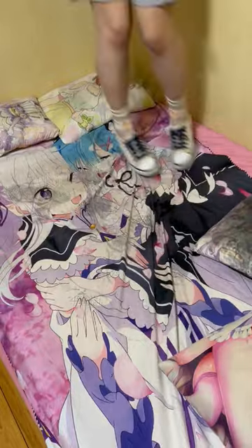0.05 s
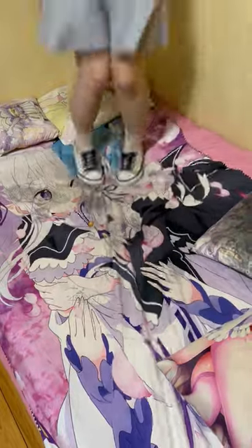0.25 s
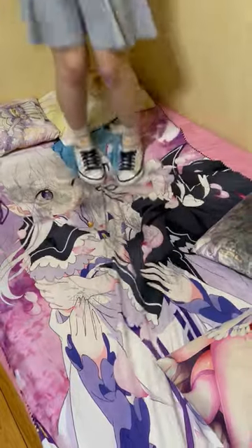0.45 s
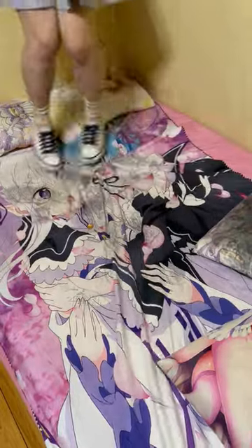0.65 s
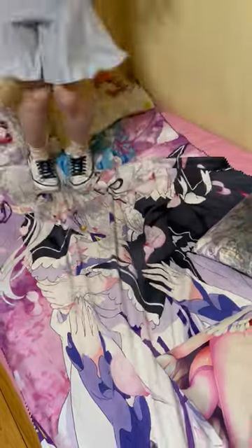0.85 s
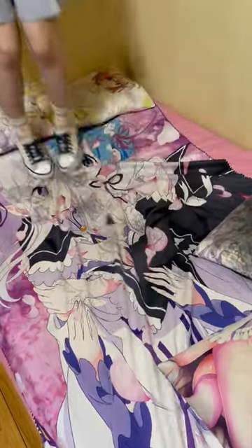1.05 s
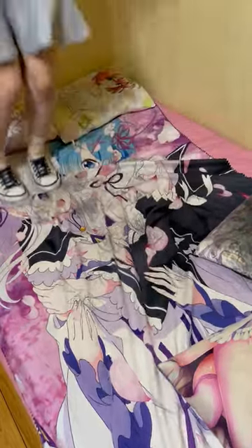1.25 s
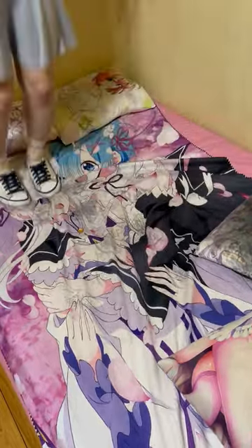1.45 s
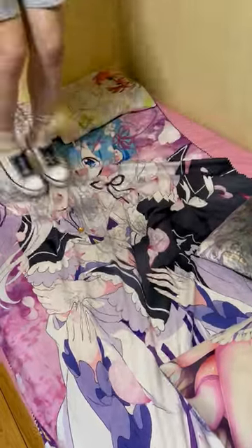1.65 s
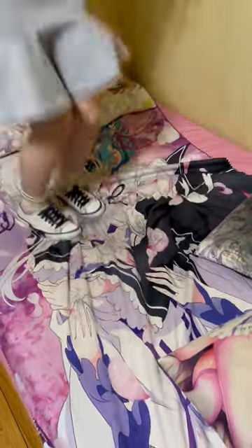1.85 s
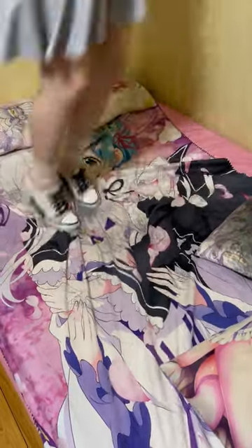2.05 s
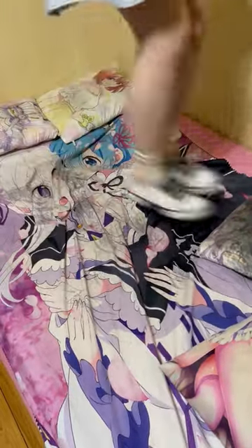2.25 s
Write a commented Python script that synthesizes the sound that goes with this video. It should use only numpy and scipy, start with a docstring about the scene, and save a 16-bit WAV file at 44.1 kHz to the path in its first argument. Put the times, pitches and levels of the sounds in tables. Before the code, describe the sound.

Someone bounces on a bed, heard close in a small room. Dull mattress thumps land at about 0.3, 0.8, 1.3 and 1.9 seconds, each with sneaker pats, rustling bedding and a lingering low hum from the bed frame. Three light metal clinks come in the first 0.6 seconds. Soles squeak faintly near 0.5 and 1.6 seconds. Small ticks lead to a cloth swish and a brighter tick at 2.2 seconds.

```python
"""A small room, a close pair of microphones: someone in canvas sneakers bounces four times on a made bed.
The frame is already humming from an earlier push; metal parts clink and a skirt flutters in flight.
At each landing the soles pat the cover, the bedding hisses as the mattress sinks and rises,
and the base thumps and hums on. Cloth drags over cloth, and twice a sole squeaks softly on the way up.
Around the last leap something ticks brightly, loudest at the very end, just after a swish of cloth."""
import sys
import numpy as np
from scipy import signal
from scipy.fft import rfft, irfft
from scipy.io import wavfile

SR = 44100
rng = np.random.default_rng(int(sys.argv[2]) if len(sys.argv) > 2 else 0)


def transcribe(signal):
    """Save signal, clipped to [-1, 1], as a 16-bit WAV file at the path in sys.argv[1]."""
    frames = np.atleast_2d(signal).T
    limited = np.clip(frames, -1, 1)
    pcm = np.round(limited * 32767).astype(np.int16)
    wavfile.write(sys.argv[1], SR, pcm)


N = 101429
T = np.arange(N) / SR
HZ = np.maximum(np.fft.rfftfreq(N, 1 / SR), 1)


def from_db(db):
    """Decibels to gain."""
    return 10 ** (np.asarray(db) / 20)


def unit_rms(x):
    """Scale to unit power."""
    return x / np.sqrt(np.mean(x ** 2) + 1e-20)


def at_hz(points):
    """Read a table at every frequency, along a log axis."""
    hz, value = np.transpose(points)
    return np.interp(np.log(HZ), np.log(hz), value)


# How alike the two microphones hear a noise. Each row: frequency in Hz, likeness from 0 to 1.
MIC_LIKENESS = [(100, .998), (300, .97), (700, .86), (1200, .75), (1900, .75), (2600, .58), (4200, .45),
                (6000, .9), (9000, .94), (15000, .9)]

def colour(pair, spectrum):
    """Give two unrelated signals a spectrum and the likeness of left and right; rms 1."""
    mid, side = rfft(pair) * from_db(at_hz(spectrum))
    alike = np.clip(at_hz(MIC_LIKENESS), 0, .9995)
    left_right = np.sqrt(1 + alike) * mid + np.sqrt(1 - alike) * side * [[1], [-1]]
    return unit_rms(irfft(left_right, N))


def noise(spectrum):
    """Smooth stereo noise."""
    return colour(rng.standard_normal((2, N)), spectrum)


def grains(spectrum, per_s, spread_db):
    """Random tiny snaps of uneven size."""
    snaps = rng.random(N) < per_s / SR
    sizes = from_db(spread_db * np.minimum(rng.exponential(1, N), 3))
    return colour(snaps * sizes * rng.choice([-1, 1], (2, N)), spectrum)


def blow(start, rise_s, t60):
    """Envelope: a smooth rise, then a fall of 60 dB every t60 seconds."""
    age = T - start
    attack = np.sin(np.pi / 2 * np.clip(age / rise_s, 0, 1)) ** 2
    return attack * from_db(-np.clip(60 * (age - rise_s) / t60, 0, 200))


def ring(start, hz, rise_s, t60):
    """A struck resonance."""
    return blow(start, rise_s, t60) * np.sin(2 * np.pi * hz * (T - start))


def swell(middle, half_s, db):
    """Envelope: a bell curve that peaks at db."""
    return from_db(db) * np.exp(-((T - middle) / half_s) ** 2 / 2)


# The room's background. Each row: frequency in Hz, relative level in dB.
AIR_SPECTRUM = [(20, -15), (40, 5), (60, 0), (170, -5.5), (300, -11), (1000, -22), (2500, -30), (6000, -38),
                (15000, -48)]

def room_tone():
    """A faint, low rush at the microphones throughout."""
    return from_db(-55.5) * noise(AIR_SPECTRUM)


# Bounces on the mattress. Each row: touch-down, deepest point and lift-off in seconds,
# then relative levels in dB of the sinking rustle, the rising rustle and the push on the frame.
BOUNCES = [(-.33, -.2, 0.15, -60, -60, -52.5), (0.136, 0.303, 0.65, -55.5, -61, -40),
           (0.676, .805, 1.128, -56, -60, -42), (1.186, 1.327, 1.624, -55.5, -58.5, -45.5),
           (1.72, 1.874, 2.13, -55.5, -55, -53)]
# The colours of the bedding. Each row: frequency in Hz, relative level in dB.
HISS_SPECTRUM = [(300, 2), (1000, 1.5), (2000, 3.5), (3500, 1.5), (6000, -0.5), (8500, -0.5), (12000, -4.5),
                 (15500, -4)]
RUSTLE_SPECTRUM = [(60, 4), (150, 1), (300, -4), (500, -11), (1000, -17), (1600, -27.5), (3000, -33.5),
                   (8000, -57)]
CRINKLE_SPECTRUM = [(200, -14), (800, 3), (2000, -3), (3800, -6.5), (6000, -14), (15000, -8)]

def bedding():
    """Cloth and padding hiss, rustle and crinkle: one swell as the feet sink, one as they rise."""
    motion = 0
    for touch, deepest, lift, sink_db, rise_db, _ in BOUNCES:
        sinking_s, rising_s = deepest - touch, lift - deepest
        sink = swell(deepest - 0.02, 0.52 * sinking_s, sink_db)
        rise = swell(deepest + 0.59 * rising_s, 0.27 * rising_s, rise_db)
        landed = np.clip((T - touch) / 0.016, 0, 1)
        not_lifted = (1 - np.tanh((T - lift) / 0.045)) / 2
        motion += landed * not_lifted * np.hypot(sink, rise)
    flatter_motion = motion.max() * (motion / motion.max() + 1e-9) ** 0.88
    hiss = from_db(2.5) * motion * noise(HISS_SPECTRUM)
    rustle = from_db(12.5) * flatter_motion * grains(RUSTLE_SPECTRUM, per_s=900, spread_db=1.5)
    crinkle = from_db(-5) * motion * grains(CRINKLE_SPECTRUM, per_s=640, spread_db=14.5)
    return hiss + rustle + crinkle


# The bed frame's modes. Each row: pitch in Hz, level in dB relative to the push, t60 in seconds.
FRAME_MODES = [(41, -2, 2), (53.57, 2, 2.7), (79, -9, 1), (101.53, 4.5, 0.8), (153.2, -2.5, 1.5)]

def frame_hum():
    """The deepest point of each bounce sets the frame humming."""
    return sum(from_db(push_db + db) * ring(deepest - 0.01595, hz, rise_s=0.032, t60=t60)
               for _, deepest, _, _, _, push_db in BOUNCES for hz, db, t60 in FRAME_MODES)


# Thumps from under the mattress. Each row: start in seconds, level in dB, pitch in Hz.
BASE_THUMPS = [(0.042, -44, 160), (.193, -36, 172), (.217, -27.5, 148), (.258, -30, 161),
               (0.279, -23.5, 154), (0.29, -21.5, 102.8), (0.307, -37, 189), (.331, -27.5, 103.4),
               (0.387, -52, 103), (0.45, -41, 151), (.702, -34.5, 149), (.737, -22.5, 144),
               (.779, -24, 154.6), (0.787, -37, 60), (0.792, -20, 97.8), (.830, -23, 98),
               (.852, -37.5, 169), (0.909, -41, 158), (1.211, -31.5, 143.7), (1.244, -31, 131.9),
               (1.258, -33.5, 192), (1.302, -25.5, 158.5), (1.311, -24.5, 95.3), (1.351, -35, 48.3),
               (1.354, -29, 108), (1.426, -42, 102), (1.545, -54.5, 160.3), (1.571, -41, 170),
               (1.751, -34, 176), (1.773, -29, 120), (1.804, -34, 171), (1.827, -27, 127.6),
               (1.854, -26, 149.2), (1.871, -29, 88.7), (1.883, -37.5, 46), (1.905, -46, 91),
               (2.005, -43, 138), (2.048, -52, 162), (2.106, -39.5, 135)]

def base_thumps():
    """The bed base thumps under the load; the lower the pitch, the longer it rings."""
    cycles_to_fade = np.log(1000) * 2.87  # about 20 cycles to fall 60 dB
    return sum(from_db(db) * ring(start, hz, rise_s=0.00554, t60=cycles_to_fade / hz)
               for start, db, hz in BASE_THUMPS)


# Clinks early on. Each row: start in seconds, then rattle, clack and ring levels in dB.
METAL_CLINKS = [(.043, -42, -40, -44), (0.31, -46.5, -45, -53), (0.5517, -48.5, -42.5, -49.5)]
# The metal's modes. Each row: pitch in Hz, level in dB relative to the ring, t60 in seconds.
METAL_MODES = [(4620, -21, 0.13), (4720, -12, 0.15), (4890, -11.5, 0.23), (4930, -18, 0.13),
               (7560, -21, .04), (9700, -11, .03)]
# The colours of a clink. Each row: frequency in Hz, relative level in dB.
CLACK_SPECTRUM = [(100, -21), (300, 2), (500, 2), (900, 0), (1200, -6), (2000, -16.5), (4000, -31),
                  (15000, -46)]
RATTLE_SPECTRUM = [(1000, 3), (3500, -20), (4900, 6), (5500, -11), (7500, -8), (9000, -2), (9650, 14),
                   (10300, -9), (11500, -7), (15500, -18)]

def metal_clinks():
    """Small metal parts knock: a dull clack, a bright rattle and a thin ring."""
    clack, rattle, out = noise(CLACK_SPECTRUM), noise(RATTLE_SPECTRUM), 0
    for start, rattle_db, clack_db, ring_db in METAL_CLINKS:
        out += from_db(clack_db) * clack * blow(start, rise_s=0.0016, t60=0.094)
        out += from_db(rattle_db) * rattle * blow(start, rise_s=0.0071, t60=0.038)
        for hz, db, t60 in METAL_MODES:
            out += from_db(ring_db + db) * ring(start, hz, rise_s=0.0071, t60=t60)
    return out


# Flutters in the air above the bed. Each row: middle and half length in seconds, level in dB.
SKIRT_FLUTTERS = [(.115, 0.093, -62), (.655, 0.031, -66), (1.16, 0.091, -68.5), (1.70, .05, -83)]

def skirt_flutters():
    """The skirt flutters in flight, a faint hiss between landings."""
    return noise(HISS_SPECTRUM) * sum(swell(*row) for row in SKIRT_FLUTTERS)


# Pats on the cover. Each row: start in seconds, knock level in dB, pitch in Hz, scuff level in dB.
SOLE_PATS = [(.153, -39, 614, -50), (.168, -45.5, 634, -51), (.197, -33, 296, -47), (0.256, -34, 330, -56),
             (.277, -29.5, 300, -43), (.3095, -41, 792, -49.5), (.436, -45, 317, -49),
             (.458, -45, 650, -45.5), (.699, -47, 330, -46), (.712, -40.5, 538, -43.5),
             (0.743, -28, 310, -48), (.776, -31, 298, -43.5), (0.915, -49, 530, -45),
             (1.202, -39.5, 304, -41), (1.246, -41.5, 433, -53), (1.296, -33.5, 313, -47.5),
             (1.48, -46.5, 346, -53), (1.493, -36, 390, -49.5), (1.498, -36, 508, -44.5),
             (1.527, -34.5, 305, -59), (1.734, -50, 700, -46.5), (1.751, -30.5, 336, -40.5),
             (1.777, -31.5, 397, -52), (1.805, -29.5, 306, -45.5), (1.836, -36, 294, -46),
             (2.019, -43, 473, -47), (2.022, -41, 933, -53), (2.053, -55, 410, -47.5),
             (2.115, -41.5, 750, -48), (2.150, -44, 754, -52.5)]
# The colour of a scuff. Each row: frequency in Hz, relative level in dB.
SCUFF_SPECTRUM = [(100, -36), (300, 12), (600, 0.5), (1000, -8), (2000, -18), (5000, -37), (15000, -30)]

def sole_pats():
    """A sole meets the cover: a dull knock with a short scuff."""
    knocks, scuffs = 0, 0
    for start, knock_db, hz, scuff_db in SOLE_PATS:
        knocks += from_db(knock_db) * ring(start, hz, rise_s=0.0021, t60=0.035)
        scuffs += from_db(scuff_db) * blow(start, rise_s=0.0021, t60=0.078)
    return knocks + scuffs * noise(SCUFF_SPECTRUM)


# Swishes at the bed. Each row: middle and half length in seconds, level in dB.
CLOTH_SWISHES = [(.46, 0.0043, -52.5), (0.799, 0.0045, -48.5), (1.074, 0.019, -53.5), (2.151, 0.014, -51),
                 (2.175, 0.011, -55)]
# The colour of dragged cloth. Each row: frequency in Hz, relative level in dB.
DRAG_SPECTRUM = [(200, -12), (500, -2), (800, 3.5), (1400, -0.5), (2200, -2), (3800, -4.5), (5000, -8),
                 (15000, -17)]

def cloth_swishes():
    """Cloth drags briefly over cloth in a dense run of tiny snaps."""
    drag = grains(DRAG_SPECTRUM, per_s=2500, spread_db=1)
    return drag * sum(swell(*row) for row in CLOTH_SWISHES)


# Squeaks on the cover. Each row: middle and half length in seconds, level in dB, middle pitch in Hz.
SOLE_SQUEAKS = [(0.531, 0.021, -53, 1130), (1.558, 0.02, -53.5, 1163)]

def sole_squeaks(sag_hz_per_s=990, roughness_hz=90):
    """Rubber slips on cloth as a sole lifts off: a rough tone that sags in pitch."""
    lowpass = signal.butter(2, roughness_hz, fs=SR, output="sos")
    roughness = unit_rms(signal.sosfilt(lowpass, rng.standard_normal(N)))
    tones = 0
    for middle, half_s, db, hz in SOLE_SQUEAKS:
        t = T - middle
        cycles = t * (hz - sag_hz_per_s * t / 2)
        tones += swell(middle, half_s, db) * np.sin(2 * np.pi * cycles)
    return roughness * tones


# Ticks around the last leap. Each row: start in seconds, then crack, body and tail levels in dB.
BRIGHT_TICKS = [(1.647, -59, -80, -103), (1.967, -47, -64, -80), (2.192, -41, -40.5, -48.5)]
# The colours of a tick's first instant and its body. Each row: frequency in Hz, relative level in dB.
CRACK_SPECTRUM = [(1000, -25), (5000, -6), (9000, 0), (13000, 2), (15500, 7)]
TICK_SPECTRUM = [(500, -25), (2200, -10), (3200, -4.5), (5200, 5.5), (7000, 3), (8800, 0.5), (11000, -2),
                 (15500, -13)]

def bright_ticks():
    """Something ticks: a glassy crack, a bright body and a fading tail."""
    crack = grains(CRACK_SPECTRUM, per_s=6700, spread_db=-1)
    body, out = noise(TICK_SPECTRUM), 0
    for start, crack_db, body_db, tail_db in BRIGHT_TICKS:
        out += from_db(crack_db) * crack * blow(start, rise_s=0.0015, t60=0.016)
        out += from_db(body_db) * body * blow(start, rise_s=0.0034, t60=0.058)
        out += from_db(tail_db) * body * blow(start, rise_s=0.0034, t60=0.26)
    return out


def room_reflections(x):
    """The near walls return a short diffuse tail, different at each microphone."""
    tail = noise([(100, -3.5), (16000, -8)]) * blow(0.0052, rise_s=0.0074, t60=0.29)
    tail /= np.sqrt(np.sum(tail ** 2) / 2)
    return from_db(-13) * signal.fftconvolve(x, tail, axes=1)[:, :N]


# Balance across the pair. Each row: frequency in Hz, left minus right level in dB.
MIC_BALANCE = [(150, 0), (350, 1.2), (700, 1.6), (1400, 1.5), (2800, -.3), (5000, -.5), (8000, 0)]
# Phase across the pair. Each row: frequency in Hz, the left microphone's lead in radians.
MIC_LEAD = [(0, 0), (700, -.4), (1400, -.4), (1900, .2), (2600, 2.2), (4200, 1.7), (5200, 1.8),
            (5950, 3.14), (8000, 6.28), (10300, 9.42), (12600, 12.57), (15000, 15.7)]

def microphone_pair(sound):
    """Two closely spaced microphones hear the bed at slightly unequal levels and times."""
    lead = np.interp(HZ, *np.transpose(MIC_LEAD))
    left_gain = from_db(at_hz(MIC_BALANCE) / 2) * np.exp(.5j * lead)
    return irfft(rfft(sound) * np.array([left_gain, 1 / left_gain]), N)


def scene():
    """From the microphones' place: the light sounds with their reflections, the low ones direct."""
    light = bedding() + metal_clinks() + skirt_flutters() + sole_pats()
    light += cloth_swishes() + sole_squeaks() + bright_ticks()
    low = room_tone() + frame_hum() + base_thumps()
    return microphone_pair(light + room_reflections(light) + low)


def record(dry):
    """The recorder cuts the deepest bass and the very top."""
    low_cut = signal.butter(4, 33.7, "high", fs=SR, output="sos")
    high_cut = signal.ellip(10, .2, 80, 15800, fs=SR, output="sos")
    return signal.sosfilt(high_cut, signal.sosfilt(low_cut, dry))


dry = scene()
out = record(dry)
transcribe(out)
```